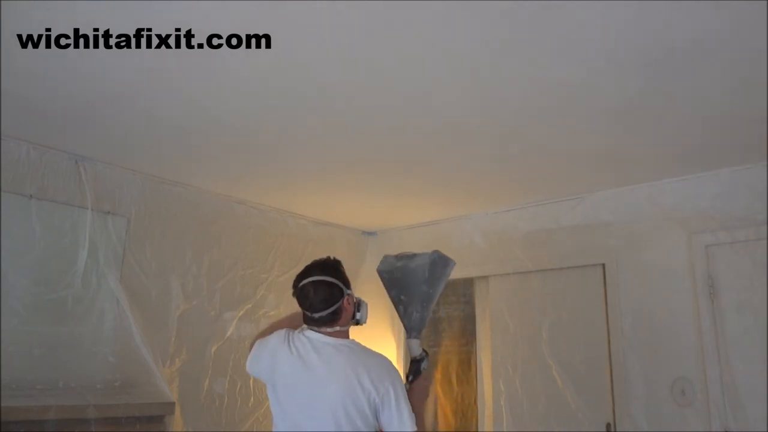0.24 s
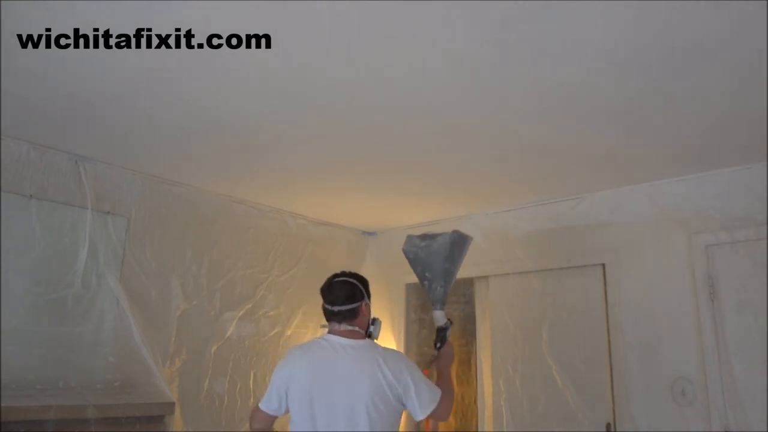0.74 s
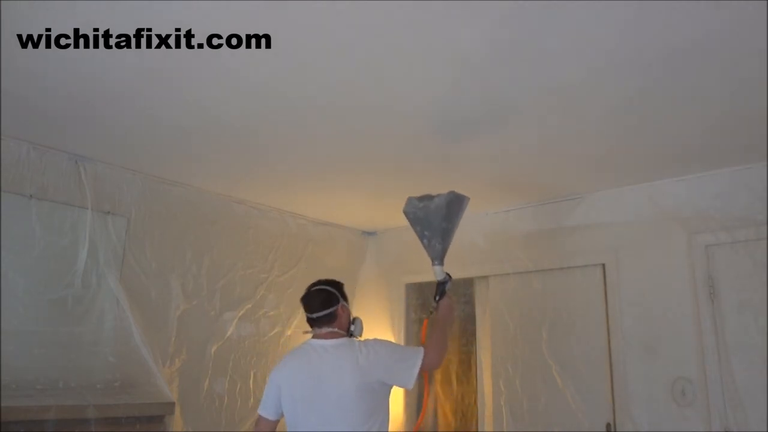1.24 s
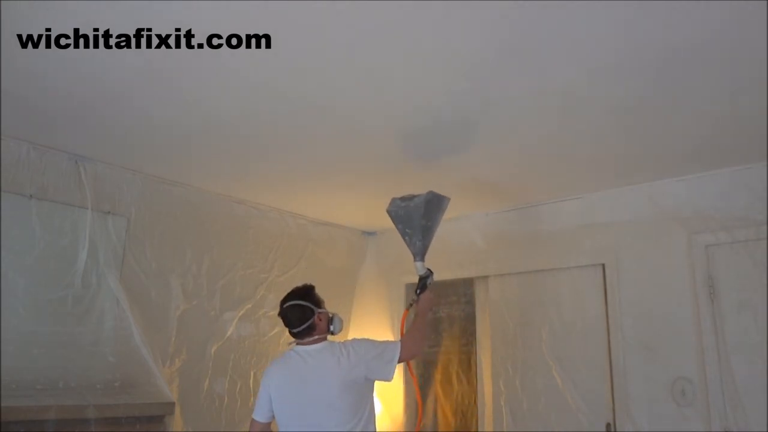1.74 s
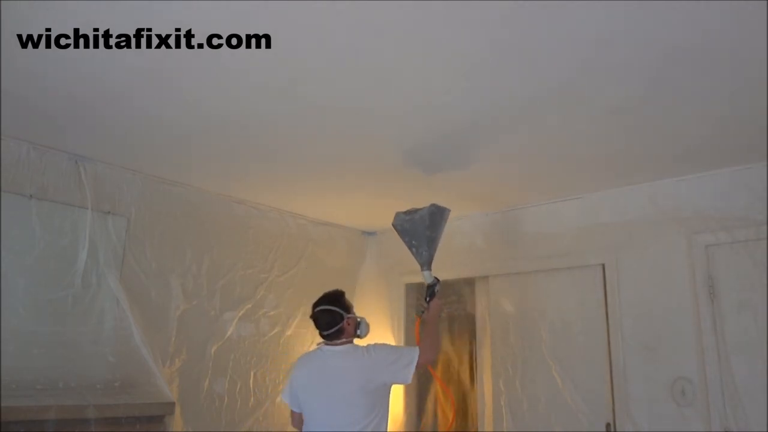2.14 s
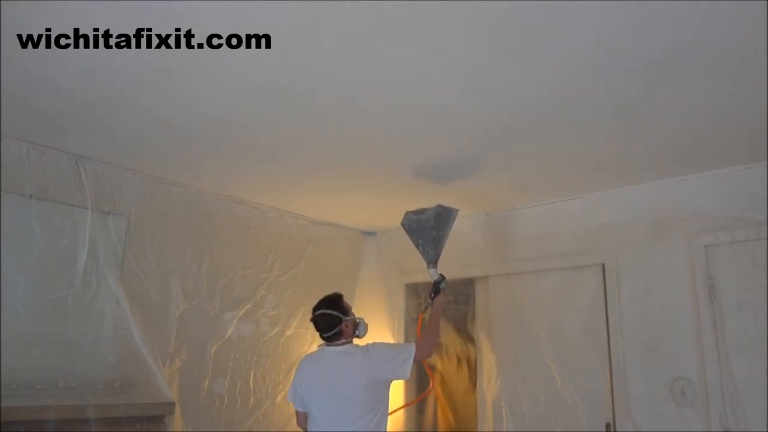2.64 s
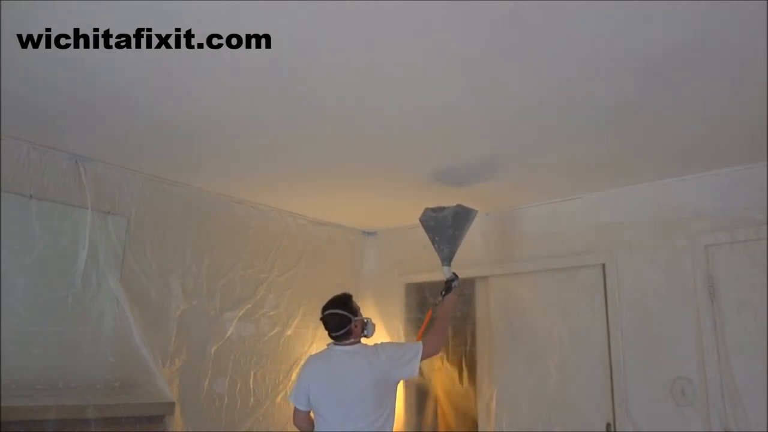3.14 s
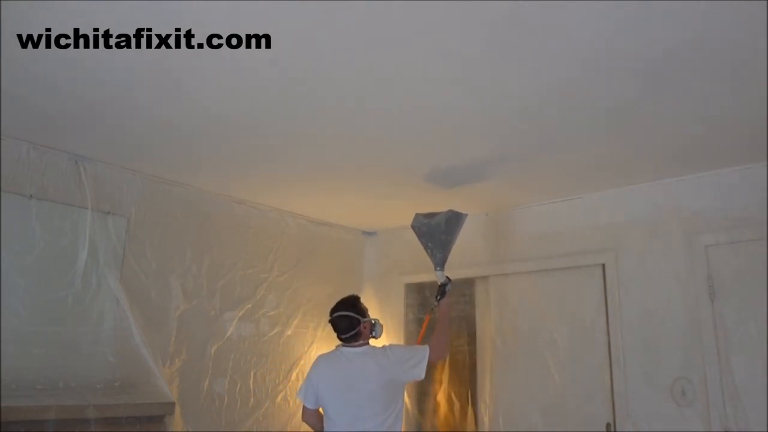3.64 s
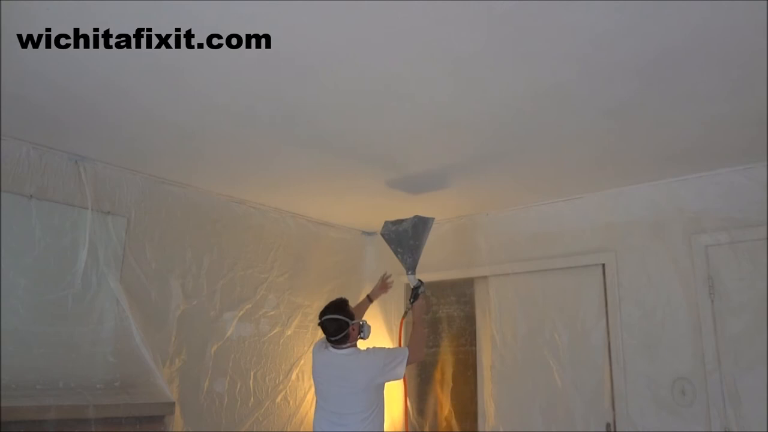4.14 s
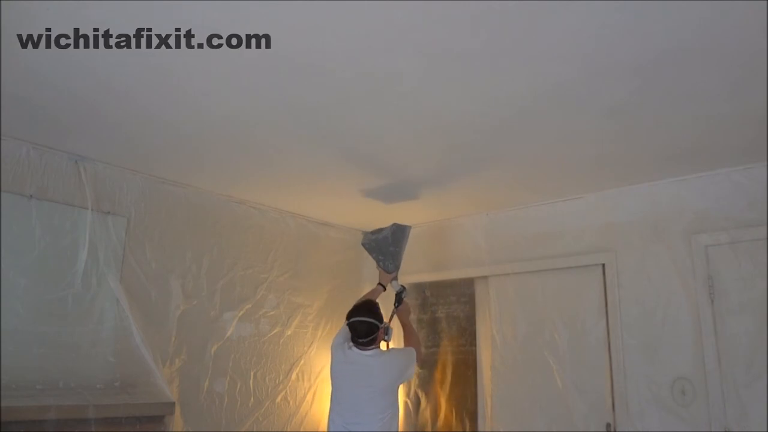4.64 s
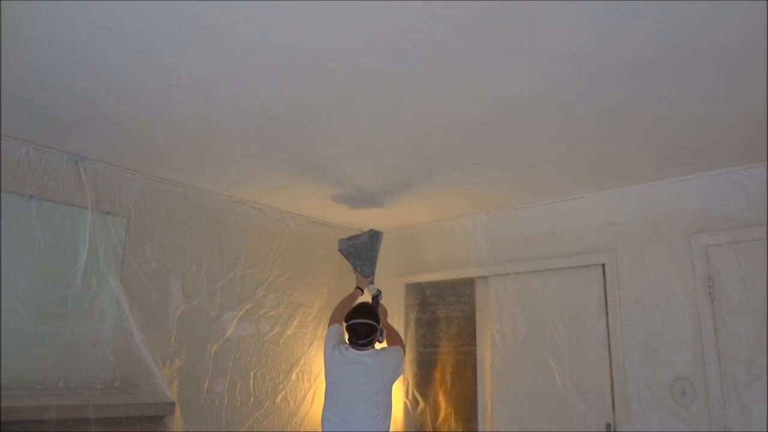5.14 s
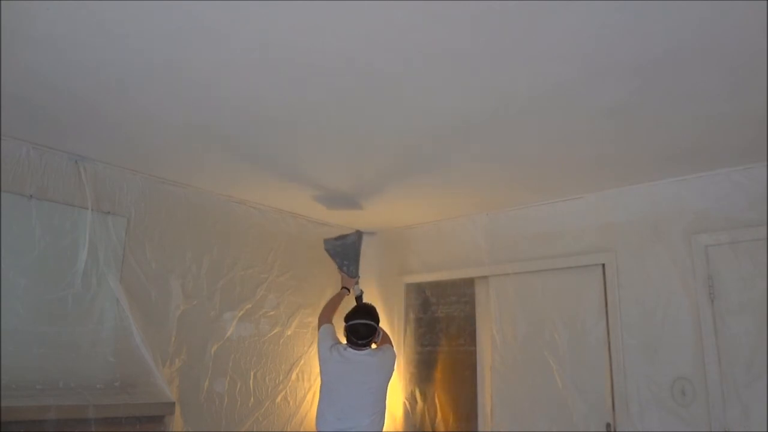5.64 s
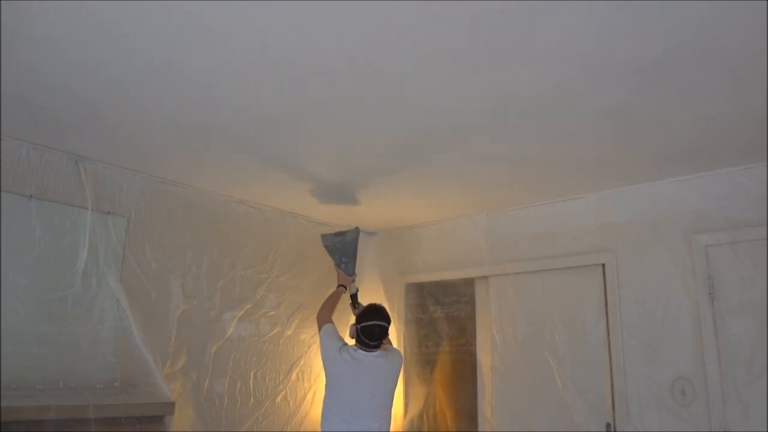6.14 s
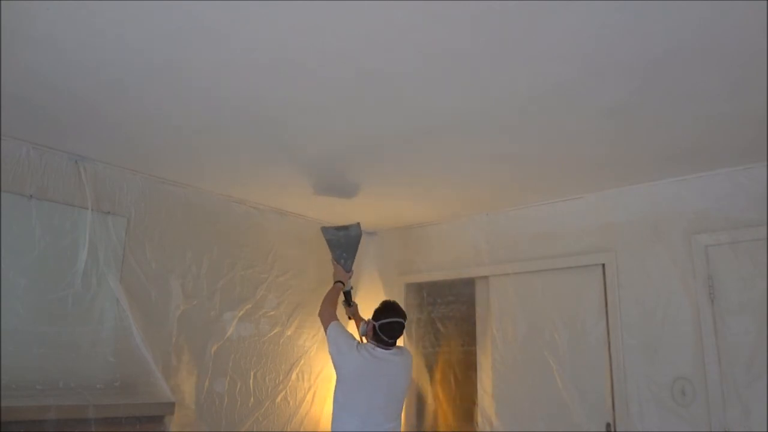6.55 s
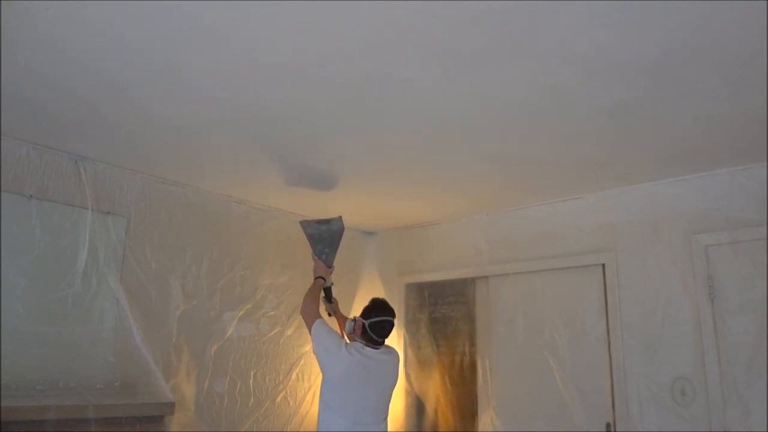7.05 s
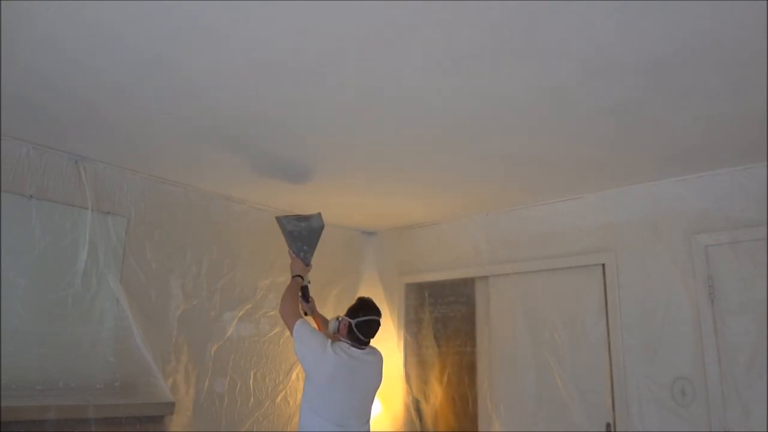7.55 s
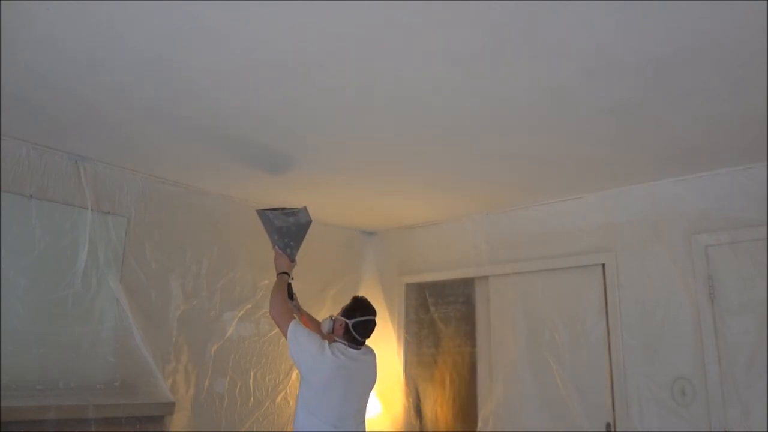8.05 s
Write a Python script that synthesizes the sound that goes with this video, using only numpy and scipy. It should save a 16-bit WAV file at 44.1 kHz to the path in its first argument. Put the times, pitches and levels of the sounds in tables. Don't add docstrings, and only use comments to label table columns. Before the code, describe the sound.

At 0 seconds a soft plastic knock and hose rustle sit over a faint, hollow, whistling air leak, low floor rumble and a very dull distant compressor drone. From about 0.4 the hiss climbs quickly; a cluster of hopper knocks and a crinkle land near 0.5, and by 0.7 the air is a loud, bright, steady blast, fluttering slightly, with another tap near 0.8. Small dull bumps come around 2.35. At about 3.1 wet mud enters and the hiss gains a thicker, grainy midrange. Short hollow spits burst at 3.4, 3.55, 3.9, 4.1 and 4.7, with a lesser sputter near 4.4. Afterwards the full spray continues evenly, with gentle swells near 5.3 and 7.3 and barely audible plastic stirring, still running at 8.3. Bare walls add short shifting echoes; the stereo perspective is across the room.

```python
import sys
import numpy as np
from scipy import signal
from scipy.fft import rfft, irfft
from scipy.io import wavfile
from scipy.ndimage import uniform_filter1d, minimum_filter1d

SR = 44100
rng = np.random.default_rng(int(sys.argv[2]) if len(sys.argv) > 2 else 0)


def file_out(sig):
    cols = np.atleast_2d(sig).T
    lim = np.clip(cols, -1, 1)
    pcm = np.round(lim * 32767).astype(np.int16)
    wavfile.write(sys.argv[1], SR, pcm)


def elevation(decibels):
    levels = np.asarray(decibels, float)
    return 10 ** (levels / 20)


N = 365588
T = np.arange(N) / SR
HZ = np.maximum(np.fft.rfftfreq(N, 1 / SR), 1)


def on_log_hz(table, hz):
    f, v = np.transpose(table)
    return np.interp(np.log(hz), np.log(f), v)


def curves(table):
    s, *columns = np.transpose(table)
    return [np.interp(T, s, c) for c in columns]


def swells(rows, bed_db):
    power = sum(elevation(2 * db) * np.exp(-((T - s) / length) ** 2 * 2) for s, db, length in rows)
    return 10 * np.log10(power + elevation(2 * bed_db))


def colour(x, db):
    return irfft(rfft(x) * elevation(db), N)


def unit(x, lo_hz=20, hi_hz=20000):
    inside = (HZ > lo_hz) & (HZ < hi_hz)
    return x * N / np.sqrt(2 * np.sum(np.abs(rfft(x)[inside]) ** 2))


def walk(rate):
    k = int(SR / rate)
    held = np.repeat(rng.standard_normal(N // k + 1), k)
    return 0.54 * uniform_filter1d(uniform_filter1d(held, k), k)[:N]


def turbulence(source, spectrum, shared_db, own_db, extra_db=lambda hz: 0):
    bins = rfft(source) * elevation(on_log_hz(spectrum, HZ))
    out, surge = 0, shared_db * walk(22)
    lowest_hz, highest_hz = spectrum[0][0], spectrum[-1][0]
    for hz in lowest_hz * 2 ** np.arange(0, np.log2(highest_hz / lowest_hz) + .5, .5):
        band = np.cos(np.pi * np.clip(np.log2(HZ / hz), -.5, .5)) ** 2
        out = out + irfft(bins * band, N) * elevation(surge + own_db * walk(18) + extra_db(hz))
    return out


def droplets(per_s, scatter_db, hiss):
    struck = rng.random(N) < per_s / SR
    clicks = struck * rng.standard_normal(N) * elevation(scatter_db * rng.exponential(size=N))
    return unit(clicks) + hiss * rng.standard_normal(N)


def resonate(x, modes):
    return sum((-1) ** k * elevation(db) * signal.lfilter(*signal.iirpeak(hz, hz / width, SR), x)
               for k, (hz, width, db) in enumerate(modes))


def air_flow():
    # t/s, air flow level/dB, gun turned toward the microphones/dB
    flow = [(0.0, -45, 9), (0.04, -37, 8), (0.18, -39, 7), (0.39, -28, 9.5), (0.55, -14, 3),
            (0.7, -11, -0.5), (0.95, -12, -3), (1.25, -11.5, 1), (1.5, -14, 0), (1.85, -12, 0),
            (2.45, -13.5, 1.5), (3.08, -13, 1.5), (3.35, -14.5, 1), (4.3, -13.5, -1), (5.6, -13.5, -1),
            (6.2, -14, -1), (6.7, -13, -2.5), (8.29, -13, -1)]
    return curves(flow)


def air_jet(jet_db, shoulder_db):
    # f/Hz, level/dB per Hz
    air = [(880, -72), (1500, -32), (1770, -25), (2410, -21), (3500, -13), (3780, -12), (5830, -8),
           (6490, -9), (11800, -1.5), (13400, -4), (15700, -13)]
    # f/Hz, level/dB per Hz
    valve_leak = [(880, -45), (1500, -22), (1920, -12), (2200, -19), (2790, -1), (3430, -16), (3780, -5),
                  (4380, 2), (5030, -17), (5490, 3), (5890, -5), (7830, -5), (8310, -4), (12600, 4.5),
                  (15700, -8)]
    swing_db = shoulder_db - np.median(shoulder_db)

    def shoulder_swing(hz):
        return np.clip(np.log2(9500 / hz) / 0.71, 0, 1) * swing_db

    jet = unit(turbulence(rng.standard_normal(N), air, 0.79, 0.95, shoulder_swing), 7500, 13520)
    leak = unit(turbulence(rng.standard_normal(N), valve_leak, .7, 1.0), 8000, 14400)
    opening = np.clip((jet_db + 31.5) / 12, 0, 1)
    return (np.sqrt(opening) * jet + np.sqrt(1 - opening) * leak) * elevation(jet_db)


def mud_feed(turn_db):
    # t/s, spray
    # level/dB, length/s
    surges = [(.53, -40, .06), (.78, -38.5, 0.11), (1.04, -41, 0.058), (1.25, -43, 0.21),
              (1.55, -41.5, 0.034), (1.89, -44, 0.037), (2.03, -45, .03), (3.39, -28, 0.021),
              (3.545, -29.5, 0.032), (3.88, -30.5, 0.048), (4.09, -32.5, 0.036), (4.43, -32.5, .04),
              (4.7, -28, 0.035), (5.31, -39, 0.25), (5.66, -34.5, 0.09), (6.28, -43, 0.018),
              (6.66, -45, 0.021), (7.33, -36.5, 0.12)]
    feed_s, rise_s = 3.095, 0.21
    dry_db, wet_db, sag_db_per_s = -48, -34, 0.32
    feed = np.clip((T - feed_s) / rise_s, 0, 1)
    spray_db = dry_db + feed * (wet_db - dry_db - sag_db_per_s * (T - feed_s))
    mud_db = swells(surges, spray_db)
    shoulder_db = -11 + turn_db + feed * (5.5 + 0.19 * (mud_db - spray_db))
    return feed, mud_db, shoulder_db


def mud_spray(mud_db):
    # f/Hz, level/dB per Hz
    mud = [(290, -59), (500, -30), (779, -19), (1350, -5.5), (2100, -6), (3080, -2), (4000, -6),
           (5200, -0.5), (8800, -120)]
    return unit(turbulence(droplets(6000, 1.76, 1.3), mud, 0.82, 2.5), 920, 2580) * elevation(mud_db - 2.0)


def spits():
    # t/s, level/dB, length/s
    pockets = [
        (3.376, -23, 0.023),
        (3.396, -24, .015),
        (3.542, -27, .025),
        (3.875, -24, 0.033),
        (4.075, -22, 0.028),
        (4.12, -42, 0.0091),
        (4.43, -53, .03),
        (4.69, -23, 0.033),
    ]
    # f/Hz, width/Hz, level/dB
    barrel = [(670, 56, -8.5), (1346, 77, -1.5), (2040, 100, 6), (2520, 260, 2.5), (3320, 770, -1.5)]
    puff = sum(elevation(db) * np.exp(-.5 * ((T - s) / (0.29 * length)) ** 2) for s, db, length in pockets)
    return 3.4 * resonate(puff * rng.standard_normal(N), barrel)


def knocks():
    # t/s, level/dB, brightness/dB
    blows = [(0.041, -27.5, -1.5), (.07, -43, 6), (.49, -38, 0), (.517, -25, 4.5), (0.535, -35, 7),
             (0.562, -26.5, -4), (0.771, -35.5, 7), (1.129, -45, 2), (2.335, -38, -13), (2.355, -34, -13),
             (2.372, -35, -12), (2.535, -48, -8)]
    # f/Hz, width/Hz, level/dB
    hopper = [(160, 68, -21), (370, 29, -4.5), (594, 89, -5.5), (930, 250, -9)]
    thud, crack = np.zeros((2, N))
    for s, db, bright_db in blows:
        fade = np.exp(-np.maximum(T - s, 0) / 0.0078) * (T >= s)
        thud += elevation(db) * fade
        crack += elevation(db + bright_db) * fade
    noise = rng.standard_normal(N)
    return 7.2 * resonate(thud * noise, hopper) + 3.9 * resonate(crack * noise, [(2050, 1050, 0)])


def sheet_and_hose(feed):
    # t/s, level/dB, length/s
    brushes = [(.04, -45.5, 0.12), (.27, -52.5, 0.38), (.53, -36, 0.058), (.74, -43, 0.091),
               (1.13, -47, 0.052), (2.38, -47, .02), (2.54, -54, .03), (3.16, -54, 0.047), (3.55, -58, .03),
               (3.74, -57, .05), (4.43, -52, .05), (4.62, -59, .04), (4.87, -55, 0.096), (5.45, -53, 0.056),
               (6.4, -53, 0.22), (6.74, -50, 0.054), (7.2, -56, .1), (7.8, -59, 0.77)]
    # f/Hz, level/dB per Hz
    crinkle = [(71, -57), (120, -18.5), (244, -16), (380, -7), (598, -3), (708, -3.5), (779, -2.5),
               (1500, -6.5), (1950, -32), (3300, -120)]
    rustle_db = swells(brushes, -61.5 + 3 * feed)
    rustle = unit(turbulence(droplets(1500, 1.6, 1.8), crinkle, 0.91, 1.5), 250, 900)
    return rustle * elevation(rustle_db - 4.5)


def footing():
    # t/s, level/dB, length/s
    steps = [(.04, -71, 0.057), (.3, -68, 0.079), (.6, -72, .1), (.85, -67, .07), (1.25, -73, .07),
             (1.75, -78, .1), (2.08, -89, .05), (2.63, -75, .05), (3.16, -78, .04), (3.74, -74, .04),
             (4.38, -70, .07), (4.62, -80, 0.033), (5.3, -75, .04), (5.54, -92, .04), (5.86, -80, .04),
             (6.6, -84, .04), (6.76, -76, .05), (7.13, -73, .04), (8.29, -72, .04)]
    # f/Hz, level/dB per Hz
    floor = [(12, -40), (25, -9), (45, -13), (65, -1), (85, -3), (130, -9), (200, -35)]
    busy_db, still_db, settle_s = -73, -104, .75
    bed_db = still_db + (busy_db - still_db) * np.exp(-(T / settle_s / 2) ** 2)
    rumble = unit(turbulence(rng.standard_normal(N), floor, 2.5, 2.5), 20, 90)
    return rumble * elevation(swells(steps, bed_db))


def nearby_walls(x):
    echo_s, echo_db, stay_s = .016, -5.5, .16
    hop, out = int(stay_s * SR), np.zeros(N + SR)
    t = T[:2048]
    for start in range(-hop, N, hop):
        echoes = rng.standard_normal(2048) * np.exp(-t / echo_s)
        echoes *= elevation(echo_db) / np.sqrt(np.sum(echoes ** 2))
        echoes[0] = 1
        at = np.arange(max(start, 0), min(start + 2 * hop, N))
        fade = np.sin(np.pi * (at - start) / (2 * hop)) ** 2
        piece = signal.fftconvolve(x[at] * fade, echoes)
        out[at[0]:at[0] + len(piece)] += piece
    return out[:N] / np.sqrt(1 + elevation(2 * echo_db))


def room(x):
    t60_s = 0.44
    t = T[:SR]
    tail = rng.standard_normal(SR) * np.exp(-np.log(1000) * t / t60_s) * (t > .006)
    return signal.fftconvolve(x, tail / np.sqrt(np.sum(tail ** 2)))[:N]


def compressor():
    # f/Hz, level/dB per Hz
    drone = [(59, -53), (100, -20), (161, -3.5), (362, -2), (428, -12), (500, 1), (650, -32), (1100, -120)]
    return unit(room(turbulence(rng.standard_normal(N), drone, .5, 1.3))) * elevation(-68)


def microphone_pair(mid, jet_db):
    # f/Hz, level/dB
    lean = [(60, -1), (300, 2), (1290, 6.5), (2380, 8), (4400, 3), (8120, 1), (15000, 0)]
    # f/Hz, level/dB
    spread = [(60, -20), (200, -16), (700, -20), (1290, -9.5), (2380, -11), (4400, -11.5), (6500, -19.5),
              (11000, -23.5), (15000, -23.5)]
    # f/Hz, level/dB
    quiet_spread = [(60, -14), (300, -1), (1500, -2), (3500, -6), (6000, -6), (11000, -9), (14500, -15)]
    side = colour(room(mid), on_log_hz(spread, HZ)) * elevation(1.5 * walk(20))
    faint = np.clip((-12.5 - jet_db) / 4, 0, 1) * (T < 1)
    side = side + faint * colour(np.roll(room(mid), -1200), on_log_hz(quiet_spread, HZ))
    lean_db = on_log_hz(lean, HZ) / 2
    return np.array([colour(mid, lean_db) + side, colour(mid, -lean_db) - side])


def scene():
    jet_db, turn_db = air_flow()
    feed, mud_db, shoulder_db = mud_feed(turn_db)
    events = spits() + knocks()
    gun = nearby_walls(air_jet(jet_db, shoulder_db) + mud_spray(mud_db) + events)
    mid = gun + sheet_and_hose(feed) + footing() + compressor()
    mid = mid + elevation(-1) * room(events)
    return microphone_pair(mid, jet_db)


def top_cut(x):
    return signal.sosfilt(signal.butter(12, 15890, fs=SR, output="sos"), x)


def record(dry):
    room_left = np.minimum(1, 1.04 / np.maximum(np.abs(dry).max(axis=0), 1e-9))
    gain = uniform_filter1d(minimum_filter1d(room_left, size=129), size=128)
    return top_cut(dry * gain)


dry = scene()
out = record(dry)
file_out(out)
```